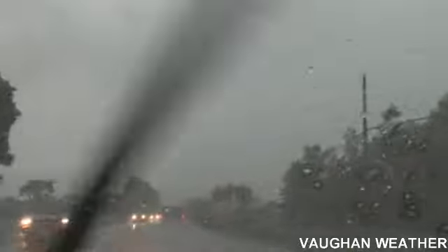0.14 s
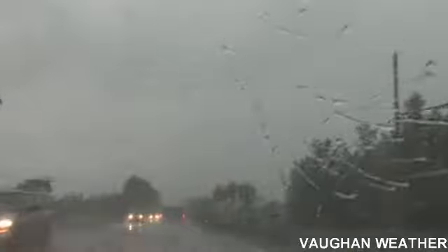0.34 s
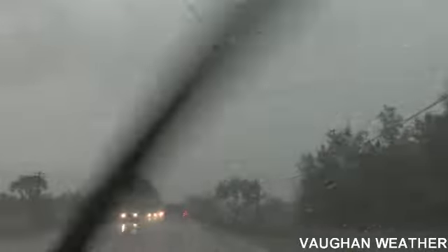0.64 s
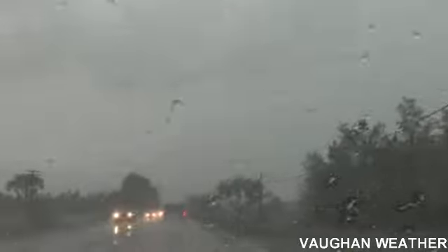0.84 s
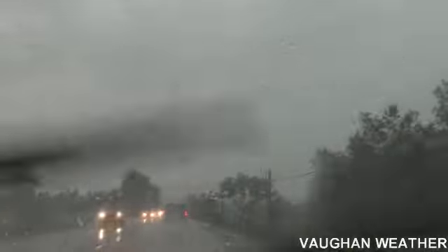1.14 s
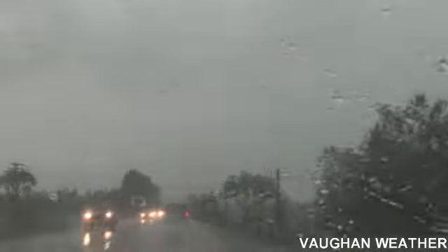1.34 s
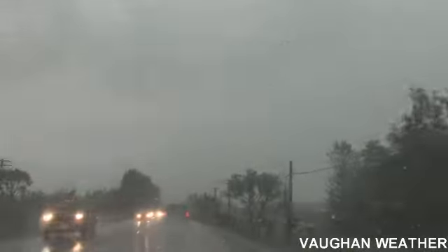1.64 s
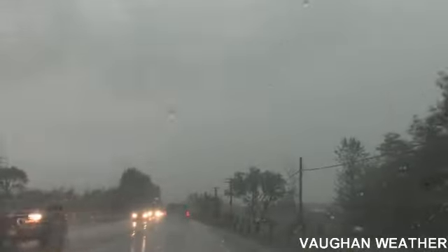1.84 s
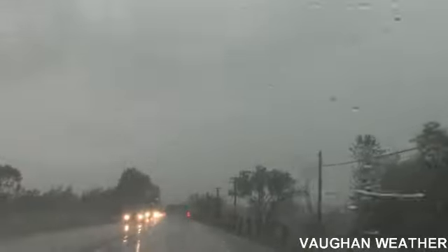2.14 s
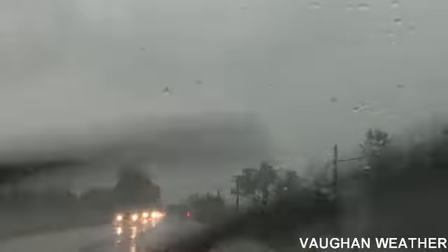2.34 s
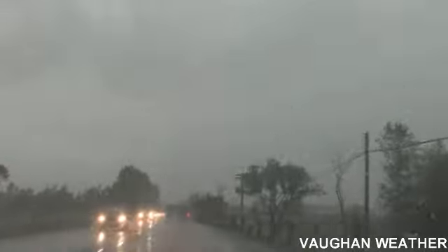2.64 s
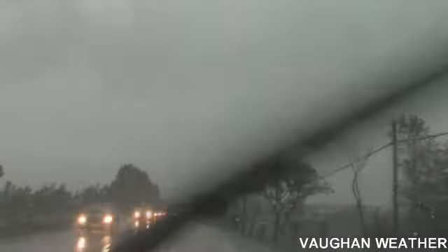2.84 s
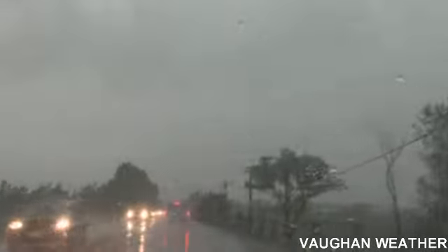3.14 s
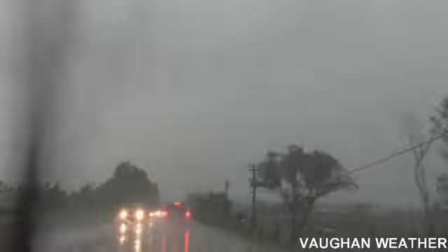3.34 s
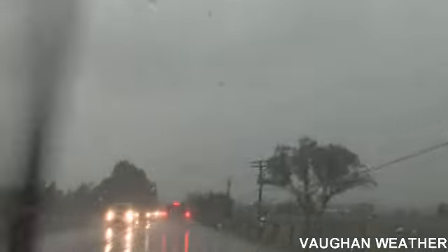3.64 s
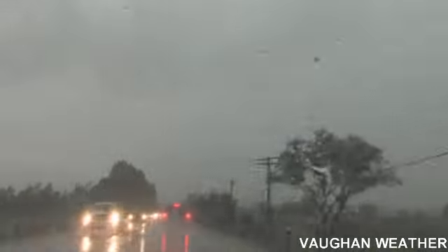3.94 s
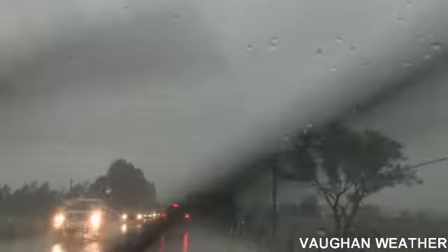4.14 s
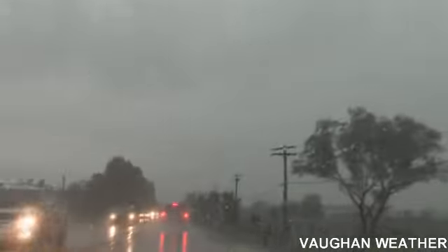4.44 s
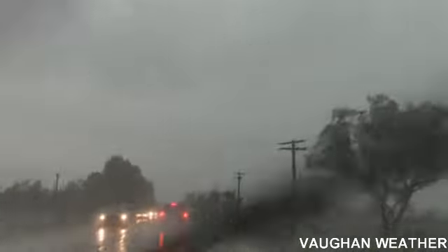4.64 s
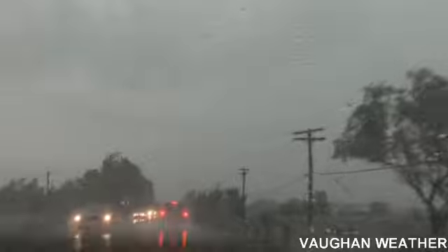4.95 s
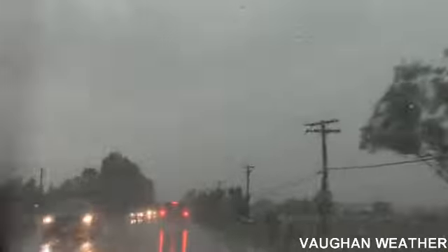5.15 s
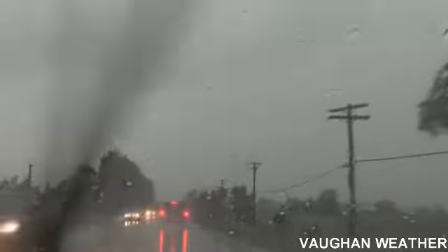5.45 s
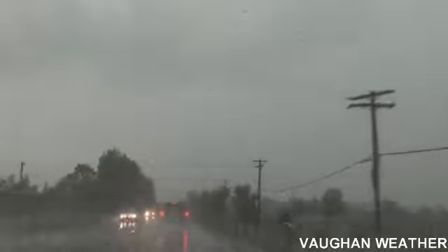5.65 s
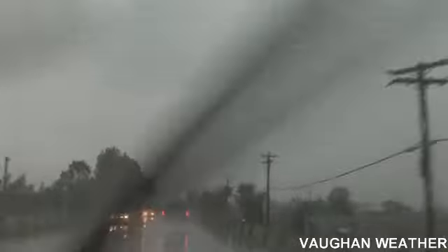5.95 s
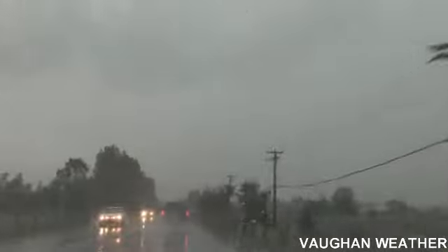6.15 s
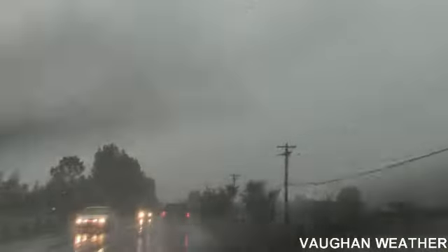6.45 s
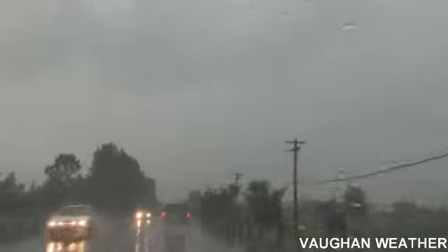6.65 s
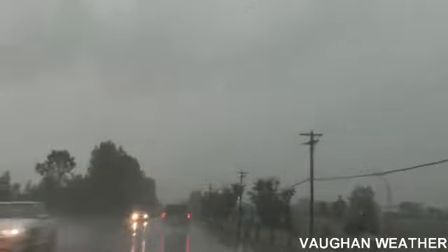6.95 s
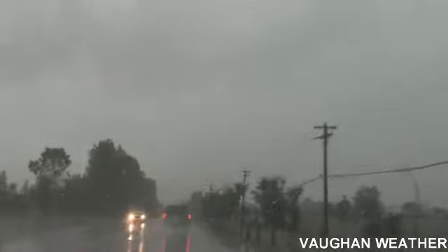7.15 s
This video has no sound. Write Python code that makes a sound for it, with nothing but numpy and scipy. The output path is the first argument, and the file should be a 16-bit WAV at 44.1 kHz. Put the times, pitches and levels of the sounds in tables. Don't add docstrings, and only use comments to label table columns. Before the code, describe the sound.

Heard from inside a car on a wet road: dense sheets of rain burst on the glass and roof, with sharp ticks and a few tiny metallic pings, easing after two seconds. Underneath run a low boomy rumble, dull tyre roar, bump thuds and thin vent hiss. Wipers knock regularly, later with dry clacks, and something small snaps close by near the end.

```python
import sys
import numpy as np
from scipy import signal
from scipy.fft import next_fast_len
from scipy.io import wavfile
from scipy.ndimage import uniform_filter1d

SR = 44100
rng = np.random.default_rng(int(sys.argv[2]) if len(sys.argv) > 2 else 0)


def field_ratio(decibels):
    return 10 ** (np.asarray(decibels, dtype=float) / 20)


def to_wav(sig):
    pcm = np.clip(np.atleast_2d(sig), -1, 1) * 32767
    pcm = np.round(pcm).astype(np.int16)
    wavfile.write(sys.argv[1], SR, pcm.T)


N = 321489


def seconds():
    return np.arange(N) / SR


def evened(x):
    return x / np.sqrt(np.mean(x ** 2) + 1e-20)


def curve(table):
    when, value = np.transpose(table)
    return np.interp(seconds(), when, value)


def colour(points, size=2048):
    point_hz, point_db = np.transpose(points)
    hz = abs(np.fft.fftfreq(4 * size, 1 / SR))
    log_gain = np.log(field_ratio(np.interp(np.log(hz + 1), np.log(point_hz), point_db, -70, -70)))
    minimum_phase = np.exp(np.conj(signal.hilbert(log_gain)))
    return evened(np.fft.ifft(minimum_phase).real[:size]) / np.sqrt(size)


def coloured(x, points, size=2048):
    return signal.oaconvolve(x, colour(points, size))[:N]


def resonate(x, hz, width):
    r = np.exp(-np.pi * width / SR)
    return signal.lfilter([1, 0, -1], [1, -2 * r * np.cos(2 * np.pi * hz / SR), r * r], x)


def steadied(x, share):
    size = abs(signal.hilbert(x, next_fast_len(N))[:N])
    return evened(x / (size + 0.16) ** share)


def wander(span_s):
    span = max(round(span_s * SR), 1)
    return evened(uniform_filter1d(uniform_filter1d(rng.standard_normal(N), span), span))


def add(mix, s, sound):
    part = mix[max(round(s * SR), 0):][:len(sound)]
    part += sound[:len(part)]


# pitch_hz [Hz], width_hz [Hz], level_db [dB]
DUCT_BANDS = [(1320, 260, -52.5), (1800, 360, -49), (2545, 94, -48.5), (3220, 260, -46.5),
              (4700, 1300, -48)]


def vent():
    out = np.zeros(N)
    for hz, width, db in DUCT_BANDS:
        band = evened(resonate(rng.standard_normal(N), hz, width))
        out += field_ratio(db + 0.4 * wander(0.053)) * steadied(band, 0.2)
    return out


LUMPY_DB, LUMP_S = 2.5, 0.017

# pitch_hz [Hz], level_db [dB]
BODY_COLOUR = [(8.8, -44), (15, -8), (43, 0.5), (85, -0.5), (110, -49), (190, -120)]


def body_rumble():
    rumble = evened(coloured(rng.standard_normal(N), BODY_COLOUR, size=8192))
    return steadied(rumble, 0.1) * field_ratio(-22 + LUMPY_DB * wander(LUMP_S))


# pitch_hz [Hz], width_hz [Hz], level_db [dB]
CABIN_MODES = [(104.8, 25, 8.5), (112, 100, -7)]
# peak_s [s], length_s [s], level_db [dB]
ROUGH_PATCHES = [(.01, 0.041, -12), (0.114, 0.04, -15), (0.54, 0.033, -17), (0.955, 0.051, -16),
                 (1.232, 0.035, -15.5), (1.446, 0.065, -14.5), (1.87, 0.065, -15), (2.414, 0.064, -14),
                 (2.516, 0.033, -10), (2.773, 0.11, -11.5), (3.04, 0.033, -18), (3.132, 0.043, -13.5),
                 (3.38, 0.066, -19.5), (3.643, 0.12, -17.5), (3.997, 0.056, -16), (4.152, 0.066, -13.5),
                 (4.57, 0.1, -15.5), (4.996, 0.25, -19), (5.256, 0.072, -15), (5.426, 0.055, -10.5),
                 (5.86, 0.18, -21.5), (6.176, .09, -14.5), (6.322, 0.07, -8.5), (6.706, .06, -14),
                 (6.967, 0.11, -18.5), (7.17, 0.13, -12.5), (7.265, 0.094, -15)]


def cabin_boom():
    road, air = rng.standard_normal(N), np.zeros(N)
    for hz, width, db in CABIN_MODES:
        air += field_ratio(db) * evened(resonate(resonate(road, hz, width), hz, 3 * width))
    t, power = seconds(), field_ratio(-22.5) ** 2
    for s, length, db in ROUGH_PATCHES:
        power = power + field_ratio(db) ** 2 * np.exp(-(2 * (t - s) / length) ** 2)
    lumps = field_ratio(0.35 + 0.51 * LUMPY_DB * wander(LUMP_S))
    return steadied(evened(air), 0.46) * np.sqrt(power) * lumps


# pitch_hz [Hz], level_db [dB]
ROAD_COLOUR = [(82, -51), (140, -7), (189, -2.5), (221, -4.5), (242, -4.5), (329, -8.5), (356, -8),
               (413, -8.5), (451, -13), (529, -12.5), (620, -17), (861, -17.5), (1010, -25.5), (1500, -34),
               (1950, -82), (3300, -120)]
# time_s [s], level_db [dB]
TYRE_LEVEL = [(0, -26.5), (.4, -25.5), (.8, -26), (1.4, -25), (2.0, -27), (2.35, -24.5), (2.8, -28),
              (3.3, -27.5), (3.8, -24.5), (4.2, -25.5), (4.7, -26), (5.3, -25.5), (5.8, -23.5), (6.2, -26),
              (6.5, -24.5), (6.85, -23), (7.29, -25.5)]


def tyre_roar():
    roar = evened(coloured(rng.standard_normal(N), ROAD_COLOUR))
    return roar * field_ratio(curve(TYRE_LEVEL) + 1.5 + 0.5 * wander(0.035))


# peak_s [s], push_db [dB], way [crest +1 or dip -1]
BUMPS = [(0.423, -9, 1), (0.549, -13, 1), (1.085, -6.5, -1), (1.237, -12, 1), (1.377, -12, 1),
         (1.459, -7, 1), (1.769, -10, 1), (2.131, -9.5, -1), (2.377, -13, 1), (2.609, -15, 1),
         (2.867, -12, -1), (3.208, -5, 1), (3.468, -11, 1), (3.544, -10, 1), (3.658, -9, -1),
         (3.813, -17, -1), (3.916, -6, 1), (4.156, -12, 1), (4.796, -10, -1), (5.249, -9, 1),
         (5.419, -5, 1), (5.696, -9.5, 1), (5.883, -13, 1), (5.989, -13, 1), (6.225, -8.5, -1),
         (6.451, -15.5, -1), (6.681, -12, -1), (6.846, -9, 1), (7.101, -4, 1)]


def jolts():
    jolt_s, jolt_hz = 0.03, 55
    t, out = seconds(), np.zeros(N)
    for s, db, way in BUMPS:
        hz = jolt_hz * rng.uniform(0.98, 1.0)
        push = np.cos(2 * np.pi * hz * (t - s)) * np.exp(-(2 * (t - s) / jolt_s) ** 2)
        out += np.sign(way) * field_ratio(db) * push
    return out


# pitch_hz [Hz], level_db [dB]
COWL_TONES = [(240, -4), (300, -0.5), (362, -6)]
# peak_s [s], blow_db [dB], low_tone_hz [Hz], upper_tones_db [dB]
BLADE_TURNS = [(0.075, -16, 209, -2.5), (0.104, -27, 195, 6), (0.532, -20, 190, -2),
               (0.986, -12.5, 165, -8), (1.387, -15, 192, -3), (1.457, -18, 187, -19),
               (1.752, -16.5, 210, -22), (1.876, -20, 194, 2.5), (1.928, -18, 206, -0.5),
               (2.286, -14, 185.4, -6.5), (2.387, -13.5, 168, -5), (2.721, -21, 239, 4.5),
               (3.153, -13.5, 185, -7), (3.259, -12, 165, -9), (3.643, -12.5, 194, 0.5),
               (4.002, -15, 200, -2), (4.048, -12, 198, -15), (4.529, -10, 178, -2),
               (4.884, -21.5, 195, 3.5), (4.929, -7.5, 194, -11), (5.416, -18.5, 174, 2.5),
               (5.847, -16, 177, -5), (6.297, -8, 173, -5), (6.642, -15, 176, -6), (6.696, -10.5, 183, -7),
               (7.145, -17, 178, -5), (7.193, -20, 186, 6)]


def wipers():
    rise_s = 0.0125
    t, out = np.arange(SR // 4) / SR, np.zeros(N)
    swell = t / rise_s * np.exp(1 - t / rise_s)
    for s, db, low_hz, upper_db in BLADE_TURNS:
        upper = 0.14 * evened(resonate(rng.standard_normal(len(t)), 460, 260))
        for hz, tone_db in COWL_TONES:
            upper += field_ratio(tone_db) * np.sin(2 * np.pi * (hz * t + rng.standard_normal()))
        tones = np.sin(2 * np.pi * low_hz * t) + field_ratio(upper_db) * upper
        add(out, s - rise_s, field_ratio(db - 2.5) * tones * swell)
    return out


# peak_s [s], level_db [dB]
LINKAGE_CLACKS = [
    (3.156, -12),
    (3.260, -14),
    (6.299, -10),
    (6.635, -11),
    (7.1905, -7.5),
]


def clacks():
    half_width_s, rounding_s = 0.0004, 0.0001
    t, out = seconds(), np.zeros(N)
    for s, db in LINKAGE_CLACKS:
        out += field_ratio(db) * np.exp(-np.sqrt((t - s) ** 2 + rounding_s ** 2) / half_width_s)
    return out


# start_s [s], peak_db [dB]
NEAR_SNAP = [
    (6.6598, -15),
]
# delay_s [s], level_db [dB]
RATTLES = [
    (.0016, -3),
    (.0030, -14),
    (.0070, -15),
    (.0100, -21),
]


def snap():
    t, out = np.arange(600) / SR, np.zeros(N)
    click = -(1 - t / 0.000089) * np.exp(-t / 0.00013)
    knock = 0.27 * np.sin(2 * np.pi * 650 * t) * np.exp(-t / 0.0043)
    for s, db in NEAR_SNAP:
        add(out, s + 0.00102, field_ratio(db + 14.0) * (click + knock))
        for delay, echo_db in RATTLES:
            rattle = uniform_filter1d(rng.standard_normal(len(t)), size=5) * np.exp(-t / 0.0012)
            add(out, s + 0.0014 + delay, field_ratio(db + 10.0 + echo_db) * rattle)
    return signal.lfilter(*signal.butter(4, 10500, fs=SR), out)


# time_s [s], patter_db [dB]
STEADY_FALL = [(0.0, -35.5), (0.2, -33), (0.8, -28), (0.86, -36.5), (1.12, -38.5), (1.25, -33), (1.75, -39),
               (2.7, -43), (2.85, -48), (3.3, -40.5), (3.5, -36.5), (4.08, -37), (4.18, -44), (4.5, -42),
               (5.1, -39), (6.2, -43.5), (7.1, -41), (7.29, -46.5)]
# start_s [s], hold_s [s], patter_db [dB]
RAIN_SHEETS = [(0.014, .015, -29), (0.129, .035, -27.5), (0.224, 0.061, -28.5), (0.296, 0.041, -25.5),
               (0.372, 0.026, -27.5), (.478, 0.082, -30), (.61, 0.058, -29), (0.726, .095, -26),
               (0.886, 0.12, -36), (0.987, 0.037, -37), (1.179, 0.045, -34), (1.25, 0.027, -44),
               (1.41, 0.022, -31.5), (1.458, 0.11, -34), (1.757, 0.045, -35.5), (1.858, 0.062, -39),
               (1.96, 0.045, -38), (2.01, .06, -29.5), (2.07, .045, -36), (3.45, 0.094, -39),
               (3.66, .03, -35.5), (4.27, .02, -42), (4.345, 0.032, -36), (4.442, .08, -38),
               (5.191, 0.076, -30.5), (5.28, 0.15, -33.5), (4.71, .04, -40.5), (5.53, .1, -41),
               (6.12, .06, -43.5), (6.6, 0.074, -46)]


def rainfall_db():
    rise_s, fall_s = 0.01, 0.021
    t, power = seconds(), field_ratio(curve(STEADY_FALL)) ** 2
    for s, hold, db in RAIN_SHEETS:
        rise = np.clip((t - s) / rise_s, 0, 1)
        fall = np.exp(-np.maximum(t - s - hold, 0) / fall_s)
        power = power + (field_ratio(db) * rise * fall) ** 2
    return 10 * np.log10(power)


def small_drops(density, drops_per_s=3200, spread_db=4.5, patches=12):
    size = field_ratio(spread_db * np.minimum(rng.exponential(1, N), 4.2))
    size *= rng.random(N) < density * drops_per_s / SR
    ticks = size * rng.choice([-1, 1], N, p=[.7, .3]) / np.sqrt(density)
    patch = rng.integers(0, patches, N)
    rings = np.zeros(N)
    for k, hz in enumerate(np.geomspace(1900, 13000, patches)):
        rings += resonate(ticks * (patch == k), hz, 0.57 * hz)
    return evened(0.61 * evened(ticks) + 0.39 * evened(rings))


def patter(level_db):
    haze = 0.52
    near = small_drops(density=field_ratio(0.5 * (level_db + 40)))
    hiss = np.sqrt(signal.lfilter([.004], [1, -.996], near ** 2)) * rng.standard_normal(N)
    far = 0.51 * hiss + 0.77 * rng.standard_normal(N)
    out = near * np.sqrt(1 - haze) + far * np.sqrt(haze)
    out *= field_ratio(level_db + 0.5 * wander(0.0022) - 0.67)
    fizz = signal.lfilter(*signal.butter(2, 6500, "high", fs=SR), out)
    return out + fizz * (field_ratio(0.18 * (level_db + 47)) - 1)


# start_s [s], tick_db [dB]
LARGE_DROPS = [(0.0238, -21), (0.2166, -20), (0.25, -14), (0.307, -22), (0.374, -19), (0.4787, -20),
               (0.5165, -15), (0.6115, -18), (0.633, -16), (0.7572, -15), (0.8173, -13), (0.9476, -21),
               (1.17, -20), (1.194, -15.5), (1.2508, -17.5), (1.2888, -20), (1.4715, -18), (1.556, -21),
               (1.635, -19), (1.761, -21), (1.985, -20), (1.9952, -17), (2.0112, -14.5), (2.0707, -20),
               (2.992, -25.5), (3.081, -25), (3.665, -19), (3.955, -20), (5.1884, -22), (5.308, -17)]


def large_drops(level_db):
    fat_per_s, splash_db = 22, -11
    landed = list(LARGE_DROPS)
    s = rng.exponential(1 / fat_per_s)
    while s < (N - 1) / SR:
        scatter_db = np.log(rng.exponential() + 0.01)
        landed.append((s, level_db[int(s * SR)] + 10 + scatter_db))
        s += rng.exponential(1 / fat_per_s)
    t, out = np.arange(1200) / SR, np.zeros(N)
    for s, db in landed:
        splat = field_ratio(splash_db) * rng.standard_normal(len(t)) * np.exp(-t / 0.0028)
        splat[:2] = -4.0, 5.8
        add(out, s + 0.0002, field_ratio(db + 2.0) * splat)
    return signal.lfilter(*signal.butter(3, 11500, fs=SR), out)


# start_s [s], peak_db [dB], pitch_hz [Hz]
METAL_DROPS = [
    (0.025, -11, 4260),
    (0.483, -7, 2740),
    (0.5134, -12, 3430),
    (0.5214, -17, 3900),
    (0.538, -17, 4430),
    (0.5774, -21, 4540),
    (0.5844, -22, 3600),
]


def pings():
    t, out = np.arange(1200) / SR, np.zeros(N)
    for s, db, hz in METAL_DROPS:
        add(out, s, field_ratio(db - 10.5) * np.sin(2 * np.pi * hz * t) * np.exp(-t / 0.001))
    return out


# pitch_hz [Hz], level_db [dB]
GLASS_COLOUR = [(650, -2), (1100, -2), (1470, -1.5), (2260, -4), (2820, -2), (3050, -1.5), (4300, 0.5),
                (6260, -9), (12700, -20.5), (14500, -16), (15500, -22)]


def rain():
    level_db = rainfall_db()
    return coloured(patter(level_db) + large_drops(level_db) + pings(), GLASS_COLOUR)


def scene():
    drone = body_rumble() + cabin_boom() + tyre_roar() + jolts()
    return (vent() + drone + wipers() + clacks() + snap() + rain())[None]


def ducked(x):
    from_db, share, recover_db_per_s = -14, 0.53, 25.5
    power_db = 10 * np.log10(abs(uniform_filter1d(x[0] ** 2, size=3600, origin=1700)) + 1e-12)
    recovery = seconds() * recover_db_per_s
    held_db = np.maximum.accumulate(power_db + recovery) - recovery
    over_db = np.maximum(held_db - from_db, 0)
    return x / field_ratio(share * uniform_filter1d(over_db, size=800))


# pitch_hz [Hz], threshold_db [dB against the usual level]
TREBLE_GATE = [(9000, -30), (11000, -8), (12300, -2.5), (13500, 2.5), (14500, 5.5), (15400, 7.5)]


def gated(x):
    follow, flicker_db = 0.75, 1.6
    window = np.sqrt(signal.windows.hann(2048, sym=False))
    hz, t, z = signal.stft(x, SR, window, nperseg=2048, noverlap=1024)
    db = 20 * np.log10(abs(z) + 1e-9)
    now_db = 10 * np.log10(uniform_filter1d(abs(z) ** 2, size=40, axis=1) + 1e-18)
    usual_db = np.median(now_db, axis=2, keepdims=True)
    threshold_db = np.interp(hz, *np.transpose(TREBLE_GATE), -99)[:, None]
    edge_db = threshold_db + usual_db + follow * (now_db - usual_db)
    edge_db += flicker_db * np.interp(t * SR, np.arange(N), wander(0.015))
    return signal.istft(z * (db > edge_db), SR, window, nperseg=2048, noverlap=1024)[1][:, :N]


def band_limit(x):
    return signal.sosfilt(signal.butter(12, 15680, fs=SR, output="sos"), x)


def record(dry):
    limited = 1.14 * np.tanh(ducked(dry) / 1.124)
    banded = signal.oaconvolve(limited, signal.firwin(255, 15600, fs=SR)[None], "same")
    banded = banded * np.minimum((N - np.arange(N)) / 100, 1)
    return band_limit(gated(banded))


dry = scene()
out = record(dry)
to_wav(out)
```